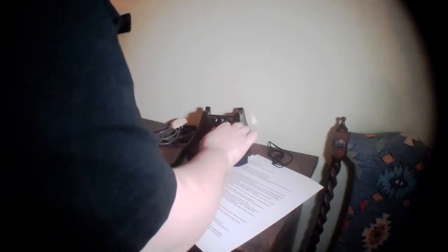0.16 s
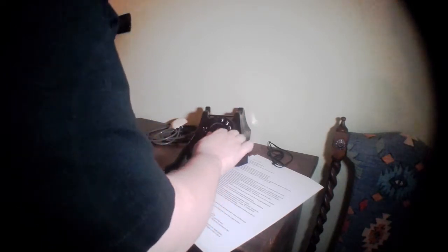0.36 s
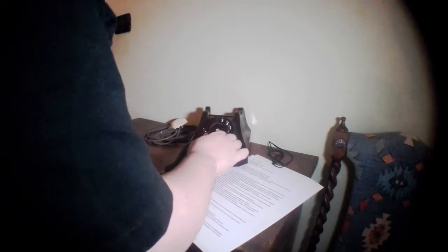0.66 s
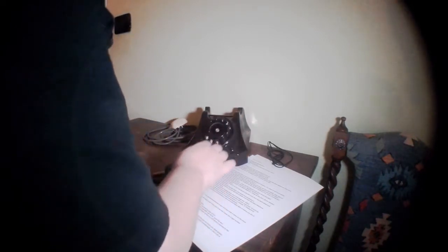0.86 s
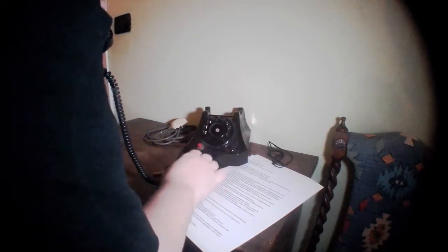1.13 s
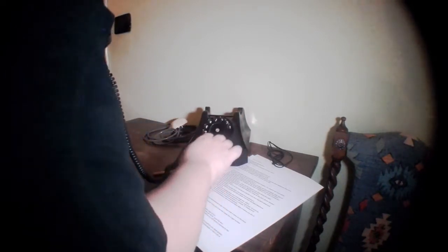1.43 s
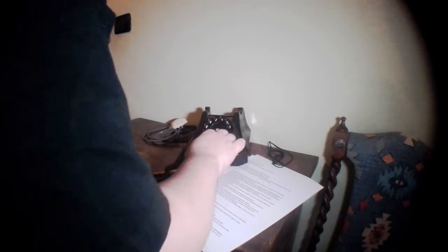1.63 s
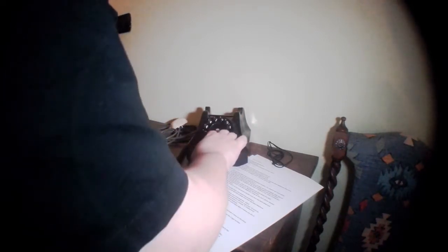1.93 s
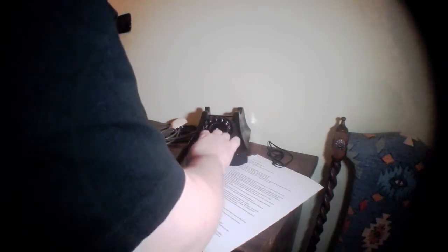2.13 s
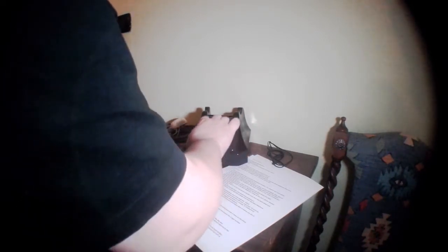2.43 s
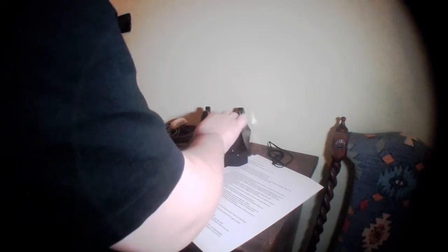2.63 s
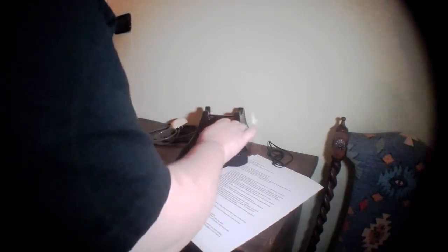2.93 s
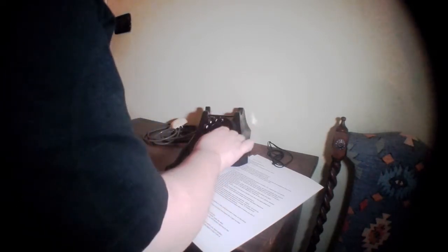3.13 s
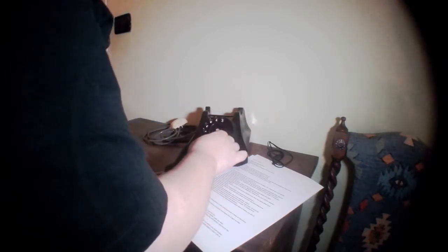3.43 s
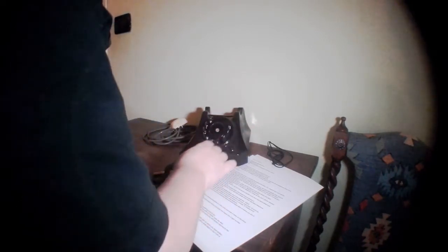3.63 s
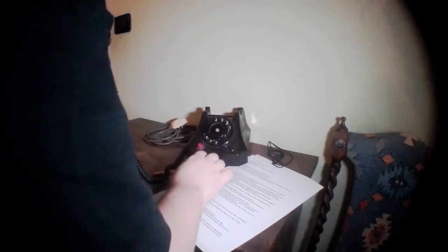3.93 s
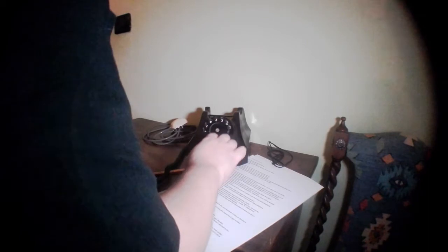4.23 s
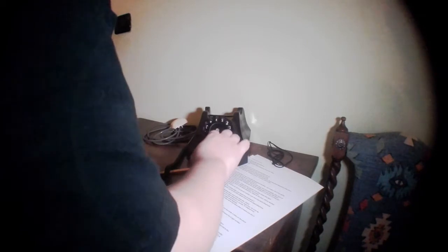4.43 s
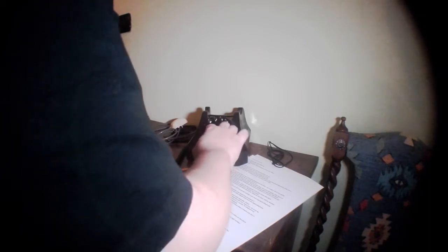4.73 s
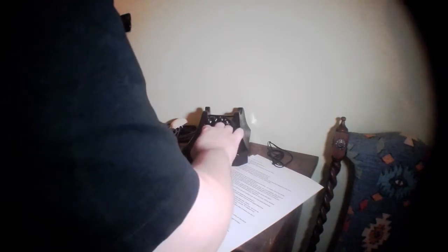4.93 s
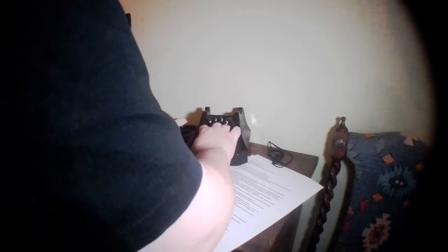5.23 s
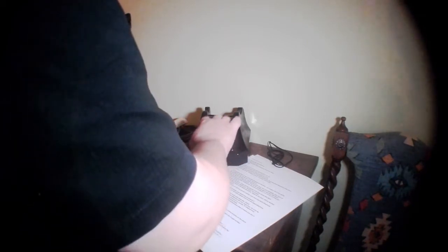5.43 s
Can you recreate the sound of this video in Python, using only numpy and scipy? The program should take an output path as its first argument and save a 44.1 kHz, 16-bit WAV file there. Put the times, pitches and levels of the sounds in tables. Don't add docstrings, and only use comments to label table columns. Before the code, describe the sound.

Close rotary phone dialing: gritty ratcheting wind-up, hard stop, whirring ticking return, knock at rest, repeated longer, then another winding begins.

```python
import sys
import numpy as np
from scipy import signal
from scipy.fft import rfft, irfft
from scipy.io import wavfile
from scipy.ndimage import uniform_filter1d

SR = 44100
rng = np.random.default_rng(int(sys.argv[2]) if len(sys.argv) > 2 else 0)


def unload_wav(signal):
    wavfile.write(
        sys.argv[1],
        SR,
        np.round(np.clip(np.atleast_2d(signal).T, -1, 1) * 32767).astype(np.int16),
    )


def ratio_of_db(decibels):
    return 10 ** (np.asarray(decibels, float) / 20)


N = 246078
THROBS_PER_DIGIT = 7 / 2

# time [s], digits turned [count].
DIAL_DIGITS = [(.8535, -2), (.9632, -1), (1.066, 0), (1.2735, 2), (1.484, 4), (1.692, 6), (3.4982, 6),
               (3.5995, 7), (3.7065, 8), (3.9105, 10), (4.115, 12), (4.3211, 14), (4.5296, 16), (4.74, 18)]
# frequency [Hz], width [Hz], level [dB].
CASE_MODES = [(1056, 38, -8), (1197, 92, -2.5), (1343, 60, 0), (1438, 131, 1), (1653, 89, -4),
              (1843, 29.4, -2.5), (1926, 277, 3), (2470, 260, -2.5)]
# frequency [Hz], width [Hz], level [dB].
PLATE_MODES = [(2450, 203, -1), (2827, 90, -4), (3050, 103, -2.5), (3770, 380, -3.5), (4070, 214, -3),
               (4676, 450, -3.5)]
# frequency [Hz], width [Hz], level [dB].
HOLLOW_MODES = [(330, 115, -4), (452.6, 41, -4), (588, 49, -2), (752, 88, -3), (832, 59, -0.5),
                (1030, 33, 2.5)]


def evened(x):
    return x / np.sqrt(np.mean(x ** 2) + 1e-20)


def wander(smooth_samples):
    once = uniform_filter1d(rng.standard_normal(N), smooth_samples)
    return evened(uniform_filter1d(once, smooth_samples))


def read(points, hz):
    f, value = np.transpose(points)
    return np.interp(np.log(hz + 1), np.log(f + 1), value)


def throbs():
    return THROBS_PER_DIGIT * np.interp(np.arange(N) / SR, *np.transpose(DIAL_DIGITS))


def moments(per_digit):
    governed = [(-2, 4.4), (7, 17.4)]
    s, digit = np.transpose(DIAL_DIGITS)
    runs = [np.arange(np.floor(a * per_digit) + 1, b * per_digit) for a, b in governed]
    at = np.concatenate([run / per_digit for run in runs])
    return at, np.interp(at, digit, s)


def levels(efforts, shares):
    t, gains = np.arange(N) / SR, np.zeros((3, N))
    for rows, (plate_db, hollow_db) in zip(efforts, shares):
        effort_db = np.interp(t, *np.transpose(rows), -200, -200)
        gains += ratio_of_db(effort_db + np.array([[0], [plate_db], [hollow_db]]))
    return gains


def return_levels():
    # time [s], drive [dB].
    drives = [
        [(0.798, -39.5), (0.804, -43.5), (0.848, -43)],
        [(0.862, -39), (0.904, -43), (1.118, -45.5), (1.188, -43.5), (1.524, -45)],
        [(3.538, -47), (3.545, -41.5), (3.594, -43)],
        [(3.608, -38), (3.63, -44.5), (3.856, -45.5), (4.432, -43), (4.676, -44.5)],
    ]
    # finger plate [dB], hollow [dB].
    drive_shares = [(-4.5, -7.5), (-6, -14.5), (-9, -11.5), (-6.5, -14.5)]
    return levels(drives, drive_shares)


def answer(modes, widen):
    t = np.arange(2048) / SR
    rings = np.zeros(len(t))
    for k, (hz, width_hz, db) in enumerate(modes):
        decay = np.exp(-np.pi * width_hz * widen * t)
        rings += (-1) ** k * ratio_of_db(db) * np.sqrt(width_hz) * decay * np.sin(2 * np.pi * hz * t)
    edges_hz = [.75 * modes[0][0], 1.25 * modes[-1][0]]
    rings = signal.sosfilt(signal.butter(2, edges_hz, "band", fs=SR, output="sos"), rings)
    return rings / np.linalg.norm(rings)


def strikes(times, peaks_db, modes, decay_s, widen=1.0):
    t = np.arange(1300) / SR
    contacts = rng.standard_normal((len(times), len(t))) * np.exp(-t / np.reshape(decay_s, (-1, 1)))
    contacts[:, 0] = 4.96
    rings = signal.fftconvolve(contacts, answer(modes, widen)[None], axes=1)
    out = np.zeros(N + rings.shape[1])
    for s, db, ring in zip(times, peaks_db, rings):
        out[round(s * SR):][:len(ring)] += ratio_of_db(db) * ring / abs(ring).max()
    return out[:N]


def gears(gains, case_modes, throb_db, per_s, spread_db, clump_db, fizz_db):
    # frequency [Hz], width [Hz], level [dB].
    fizz_modes = [(6140, 3800, 16), (8100, 16000, 16), (10950, 3700, 4), (14400, 11000, 1.5)]
    turns = throbs() - .05
    throb = ratio_of_db(sum(db * np.cos(2 * np.pi * (k + 1) * turns) for k, db in enumerate(throb_db)))
    clumps = ratio_of_db(clump_db * wander(300))
    sizes = ratio_of_db(spread_db * np.minimum(rng.exponential(1, N), 4))
    hits = (rng.random(N) < per_s / SR) * rng.choice([-1., 1.], N)
    teeth = evened(sizes * hits * clumps)
    case, plate, hollow = gains
    rubbing = ratio_of_db(fizz_db) * plate * evened(0.29 * teeth + clumps * rng.standard_normal(N))
    parts = [(case * evened(teeth * throb), case_modes), (plate * teeth, PLATE_MODES),
             (hollow * teeth, HOLLOW_MODES), (rubbing, fizz_modes)]
    return sum(signal.oaconvolve(drive, answer(modes, widen=1.32))[:N] for drive, modes in parts)


def hush():
    # frequency [Hz], density [dB per Hz].
    hiss_colour = [(20, -10), (80, -7), (180, -6), (280, -3), (600, 0), (1350, 0), (1900, -2), (2800, -6),
                   (3900, -10), (5000, -13), (7700, -11.5), (11000, -13), (15900, -14.5)]
    colour = ratio_of_db(read(hiss_colour, np.fft.rfftfreq(N, 1 / SR)))
    return ratio_of_db(-69) * evened(irfft(rfft(rng.standard_normal(N)) * colour, N))


def winding():
    # time [s], effort [dB].
    winds = [
        [(0.0, -42.5), (0.022, -46.5), (0.108, -53), (0.12, -48.5), (0.204, -51.5), (0.396, -55.5), (0.46, -70)],
        [(2.06, -50), (2.11, -67), (2.13, -48.5), (2.25, -67.5)],
        [(2.27, -49.5), (2.594, -50), (2.6, -52), (2.7, -47.5), (2.72, -47), (2.904, -53.5)],
        [(2.904, -56), (2.928, -47.5), (3.246, -50.5), (3.256, -79)],
        [(3.264, -54.5), (3.3, -51), (3.36, -63)],
        [(4.9, -60), (4.98, -74)],
        [(1.745, -64), (1.84, -79)],
        [(5.2, -81), (5.24, -59), (5.258, -55), (5.296, -63), (5.384, -56), (5.46, -72)],
        [(5.478, -51), (5.504, -43.5), (5.56, -48.5), (5.58, -35.5)],
    ]
    # finger plate [dB], hollow [dB].
    wind_shares = [(-4, -4.5), (-1, -5.5), (-6.5, -7.5), (-5.5, -10), (1, -3), (0.5, -3.5), (1, -3),
                   (-1.5, -5.5), (-4.5, -8)]
    # start [s], strength [dB], length [s].
    rests = [
        (1.536, -45, 0.1),
        (4.676, -45, 0.12),
    ]
    # finger plate [dB], hollow [dB].
    rest_shares = (-3.5, 0.0)
    shudders = [[(s, db), (s + .7 * long_s, db - 5), (s + long_s, db - 24)] for s, db, long_s in rests]
    gains = levels(winds + shudders, wind_shares + [rest_shares] * len(rests))
    return gears(gains, CASE_MODES, throb_db=(0, 0, 0), per_s=1600, spread_db=2.0, clump_db=3.0, fizz_db=-10.5)


def thuds():
    # start [s], peak [dB], lowest pitch [Hz], t60 [s].
    deep_thuds = [
        (2.114, -46.5, 135, 0.24),
        (2.148, -49.5, 120, 0.23),
        (2.667, -45.5, 168, 0.47),
        (5.238, -45.5, 143, 0.22),
        (5.27, -52.5, 120, 0.19),
        (5.559, -56, 120, 0.12),
    ]
    # start [s], peak [dB], lowest pitch [Hz], t60 [s].
    stop_thuds = [
        (1.548, -57, 198, 0.17),
        (1.6, -54.5, 194, 0.1),
        (3.264, -68, 200, 0.13),
        (4.693, -52, 190, 0.2),
        (4.72, -58, 184, 0.14),
    ]
    # start [s], peak [dB], lowest pitch [Hz], t60 [s].
    light_thuds = [
        (0.016, -71, 330, 0.089),
        (0.046, -44, 330, 0.11),
        (0.156, -44, 330, 0.38),
        (1.535, -40, 330, 0.14),
        (1.94, -58.5, 330, 0.3),
        (2.299, -41.5, 330, 0.18),
        (2.714, -41, 330, 0.091),
        (3.538, -42, 330, 0.036),
        (4.686, -38, 330, 0.088),
    ]
    out, t = np.zeros(N + SR), np.arange(SR // 2) / SR
    for rows, span in ((deep_thuds, 4.3), (stop_thuds, 1.7), (light_thuds, 3.5)):
        for s, db, hz, t60_s in rows:
            wood = signal.butter(3, [hz, span * hz], "band", fs=SR, output="sos")
            swell = ratio_of_db(-60 * t / t60_s) * (1 - np.exp(-t / 0.0025))
            boom = signal.sosfilt(wood, rng.standard_normal(len(t)) * swell)
            out[round(s * SR):][:len(t)] += ratio_of_db(db - 2.5) * boom / abs(boom).max()
    return out[:N]


def knock(s, db, bright_db, hollow_db, scatter_s):
    case = strikes(s, db - 5.0, CASE_MODES, scatter_s, widen=2.1)
    plate = strikes(s, db + bright_db, PLATE_MODES, scatter_s, widen=1.54)
    return case + plate + strikes(s, db + hollow_db - 6.0, HOLLOW_MODES, 1.4 * scatter_s)


def pawl():
    # time [s], peak [dB], bright share [dB].
    short_rides = [(0.018, -28, -26), (0.046, -27.5, -9.5), (.092, -45, -13), (0.115, -26, -13),
                   (0.151, -31, -7), (.169, -27.5, -19), (0.218, -31, -13), (.258, -36.5, -11),
                   (0.286, -35, -16), (0.32, -32.5, -16), (.353, -30, -16), (.381, -34.5, -5.5),
                   (5.346, -42, 0), (5.383, -41.5, -5), (5.42, -42, -12), (5.497, -25.5, -5),
                   (5.506, -27.5, -2.5), (5.531, -33, -6), (5.567, -33.5, 2.5), (5.574, -27.5, -5.5)]
    # time [s], peak [dB], bright share [dB].
    long_ride = [(2.323, -27, -18), (2.359, -33, -13), (2.383, -33, -29), (2.422, -33, -17),
                 (2.454, -31, -30), (2.475, -37, -17), (2.511, -36.5, -1.5), (2.555, -39, -5),
                 (2.598, -33, -5), (2.606, -30, -3), (2.811, -34.5, -4.5), (2.839, -35, -15),
                 (2.908, -36, -25), (2.921, -39, -7), (2.936, -39, 1), (3.031, -32, -3.5),
                 (3.071, -36.5, -4), (3.134, -35.5, -4), (3.199, -35.5, -27), (3.235, -32, -25)]
    s, db, bright_db = np.transpose(short_rides + long_ride)
    return knock(s, db, bright_db, hollow_db=-22.5, scatter_s=0.0045)


def blows():
    # time [s], peak [dB], bright share [dB], hollow share [dB].
    hits = [(.12, -20.5, -11.5, -18.5), (0.503, -47, -13, -20), (.798, -25.5, -10.5, -14.5),
            (.804, -21, -8.5, -15), (0.818, -32, -6, -28), (.853, -21.5, 0.5, -36),
            (1.531, -20.5, -8, -12.5), (1.556, -32, -3.5, -17), (1.745, -40, -8, -21),
            (1.793, -50, -13, -9), (2.061, -35.5, -3, -22), (2.132, -36, -3, -34), (2.176, -39, -6, -15),
            (2.269, -28.5, -17, -9), (2.287, -23, -9, -38), (2.714, -27, -1, -14),
            (3.266, -20.5, -12.5, -14.5), (3.294, -27, -13, -34), (3.436, -39.5, -7, -7),
            (3.538, -23, -15, -28), (3.55, -28.5, -7.5, -30), (3.559, -27.5, -11, -37),
            (3.599, -26, -3.5, -14), (4.684, -20.5, -13.5, -9), (4.689, -23, -7, -19),
            (4.719, -27.5, -10, -23), (4.899, -37.5, -11, -29), (5.197, -43.5, -17, -33),
            (5.255, -37, 2.5, -22), (5.478, -26, -18, -14)]
    s, db, bright_db, hollow_db = np.transpose(hits)
    scatter_s = 0.0021 / ratio_of_db(0.28 * (db + 30.5))
    return knock(s, db, bright_db, hollow_db, scatter_s)


def ticks():
    # time [s], peak [dB],
    # share above 10 kHz [dB].
    listed_ticks = [(.1206, -44.5, -27), (.2593, -51.5, -19), (.3224, -49.5, -15), (.3534, -51, -8),
                    (.391, -51, -12), (.854, -34, -22), (1.5318, -39, -32), (1.555, -46, -29), (1.7447, -52, -22),
                    (2.0597, -55, -23), (2.1301, -48, -25), (2.2872, -48, -22), (2.3965, -50, -18),
                    (2.506, -47, -18), (2.599, -43.5, -21), (2.6853, -47, -22), (2.7132, -47, -24),
                    (2.818, -48, -14), (2.9277, -46, -22), (3.026, -47, -17), (3.1258, -56, -14),
                    (3.2395, -50, -12), (3.2624, -47, -24), (3.5995, -37, -7), (4.6828, -42, -26),
                    (4.9005, -48, -13), (5.254, -47.5, -30), (5.3457, -50, -11), (5.3896, -49, -15),
                    (5.5004, -47, -24)]
    # frequency [Hz], width [Hz], level [dB].
    spring_modes = [(5580, 670, -8), (7100, 910, 10.5), (7090, 820, 8.5), (8000, 150, -15),
                    (9960, 590, -57.5)]
    # frequency [Hz], width [Hz], level [dB].
    wire_modes = [(11300, 2900, -11), (12300, 230, -9), (13000, 1800, -13), (15500, 1800, -14)]
    contact_s = moments(1)[1]
    spread_db = 0.9 * rng.standard_normal((len(contact_s), 2))
    contact = np.transpose([contact_s, -39.5 + spread_db[:, 0], -19 + 3 * spread_db[:, 1]])
    s, db, top_db = np.vstack([listed_ticks, contact]).T
    spring = strikes(s, db - 1.0, spring_modes, decay_s=0.004)
    return spring + strikes(s, db + top_db + 3.0, wire_modes, decay_s=0.0014)


def spinning():
    # frequency [Hz], width [Hz], level [dB].
    cup_modes = [(1040, 115, -2.5), (1253, 137, 2.5), (1600, 110, 1.5), (1886, 70, -3), (2020, 80, 4),
                 (2340, 110, -6)]
    throb_depths = (2.4, 1.6, 1.1)
    return gears(return_levels(), cup_modes, throb_db=throb_depths, per_s=3200, spread_db=1.0, clump_db=1.56,
                 fizz_db=-14.0)


def brush():
    brush_hz, brush_s, jitter_s = 1643, 0.0017, 0.000995
    out, t = np.zeros(N + SR), np.arange(600) / SR
    digit, times = moments(THROBS_PER_DIGIT)
    chance = rng.standard_normal((len(times), 4))
    peaks_db = -37.5 + 1.5 * np.cos(2 * np.pi * (digit + .03)) + 1.6 * chance[:, 0]
    swell = (t / brush_s * np.exp(1 - t / brush_s)) ** 2
    for s, db, (_, late, sharp, turn) in zip(times, peaks_db, chance):
        tone = np.sin(2 * np.pi * (brush_hz * (1 + 0.02 * sharp) * t + turn))
        out[round((s - 0.002 + jitter_s * late) * SR):][:len(t)] += ratio_of_db(db) * swell * tone
    return out[:N]


def gear_hum():
    # multiple of the throb, level [dB rms].
    orders = [(7, -82), (8, -77)]
    running = uniform_filter1d(1. * (return_levels()[0] > 1e-6), 3000)
    hum = np.zeros(N)
    for k, db in orders:
        waver = wander(1500)
        hum += np.sqrt(2) * ratio_of_db(db + 3.0 * waver) * np.sin(2 * np.pi * k * throbs() + 0.6 * waver)
    return running * hum


def room(x):
    # frequency [Hz], t60 [s].
    room_t60 = [(200, 0.42), (1000, 0.39), (3000, 0.28), (8000, 0.43), (15000, 0.42)]
    taps = np.zeros(SR // 2)
    at = np.arange(120, len(taps) - 20, 20)
    taps[at + rng.integers(0, 20, len(at))] = rng.choice([-1., 1.], len(at))
    hz, t, z = signal.stft(taps, SR, nperseg=256)
    tail = signal.istft(z * ratio_of_db(-60 * t / read(room_t60, hz)[:, None]), SR, nperseg=256)[1]
    return signal.oaconvolve(x, tail / np.linalg.norm(tail))[:N]


def scene():
    phone = ratio_of_db(-2.0) * (winding() + spinning())
    phone += thuds() + pawl() + blows() + ticks() + brush() + gear_hum()
    return (phone + ratio_of_db(-4.0) * room(phone) + hush())[None]


def top_cut(x):
    return signal.sosfilt(signal.butter(12, 16070, fs=SR, output="sos"), x)


def record(dry):
    low_pass = signal.firwin(511, 15900, window=("kaiser", 9), fs=SR)
    limited = signal.oaconvolve(dry, low_pass[None], "same")
    return top_cut(limited - .0005)


dry = scene()
out = record(dry)
unload_wav(out)
```